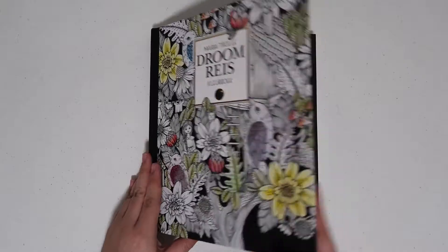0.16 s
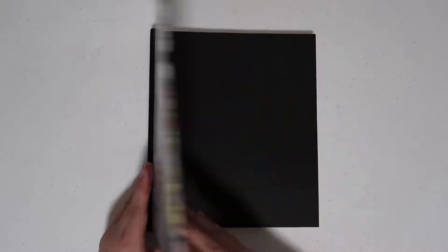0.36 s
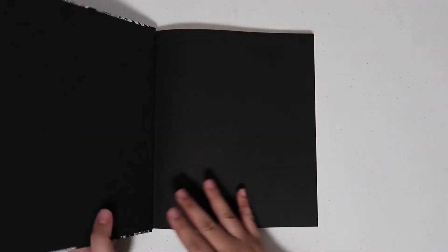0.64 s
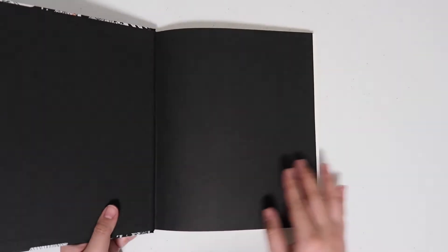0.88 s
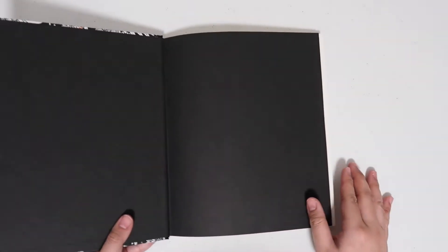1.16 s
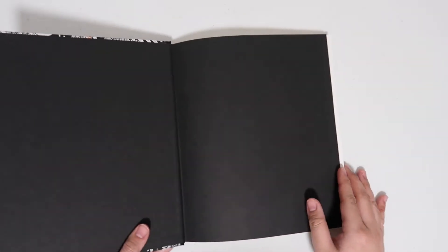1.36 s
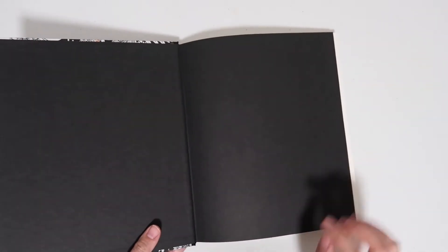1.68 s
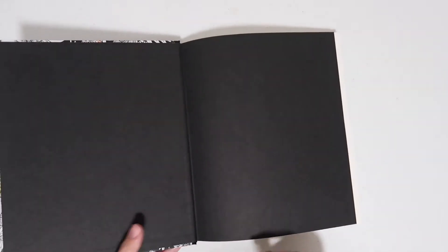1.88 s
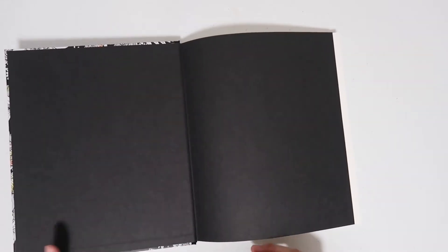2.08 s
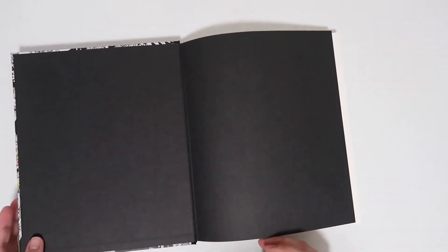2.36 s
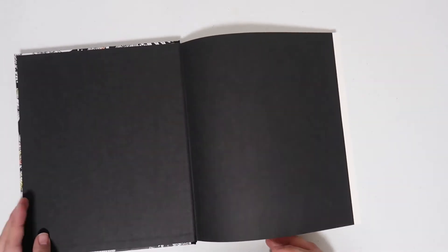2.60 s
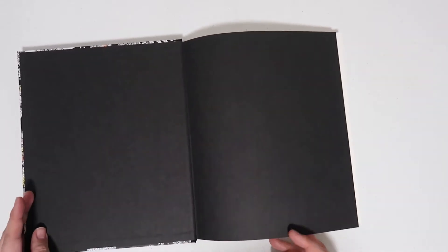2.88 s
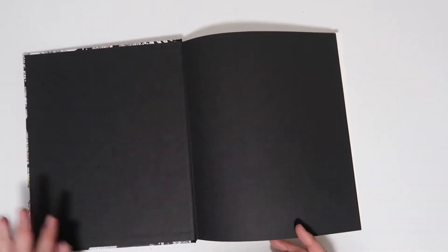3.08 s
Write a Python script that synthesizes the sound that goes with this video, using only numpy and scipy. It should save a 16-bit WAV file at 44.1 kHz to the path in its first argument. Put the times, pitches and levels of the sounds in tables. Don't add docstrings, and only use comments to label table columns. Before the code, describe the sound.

A thick book is opened on a table, close stereo microphone. After 0.1 s of silence, low ventilation rumble and hum fade in. Fingers softly brush paper until 0.5 s; a cluster of tiny spine cracks and a jerk come at 0.7 s. Gritty cover scrapes follow from 1 to 3 s, strongest near 2.3, with faint distant hums. At 3.15 s a loud, sharp knock bounces and rings briefly through the room.

```python
import sys
import numpy as np
from scipy import signal
from scipy.fft import rfft, irfft, next_fast_len
from scipy.io import wavfile
from scipy.ndimage import uniform_filter1d

SR = 44100
rng = np.random.default_rng(int(sys.argv[2]) if len(sys.argv) > 2 else 0)


def rack_gain(trim_db):
    fader = np.asarray(trim_db, float)
    return 10 ** (fader / 20)


def to_wav(s):
    ch = np.atleast_2d(s).T
    pcm = np.round(np.clip(ch, -1, 1) * 32767)
    wavfile.write(sys.argv[1], SR, pcm.astype(np.int16))


N = 142884
T = np.arange(N) / SR


def noise():
    return rng.standard_normal(N)


def unit(x):
    return x / np.sqrt(np.mean(x ** 2))


def colour(x, points):
    hz, db = np.array(points, float).T
    size = next_fast_len(2 * N)
    f = np.maximum(np.arange(size // 2 + 1) * SR / size, 1)
    gain = rack_gain(np.interp(np.log(f), np.log(hz), db))
    return irfft(rfft(x, size) * gain, size)[..., :N]


def ring(x, hz, t60):
    decay = np.log(1000) / (max(t60, 1e-4) * SR)
    pole = np.exp(2j * np.pi * hz / SR - decay)
    return signal.lfilter([1], [1, -pole], x).imag


def walk(rate_hz):
    k = int(SR / rate_hz)
    return unit(uniform_filter1d(uniform_filter1d(noise(), k), k))


def tone(hz, db):
    return rack_gain(db) * np.sqrt(2) * np.sin(2 * np.pi * hz * T)


def fan():
    hz, width_hz = 59.4, 21
    hum = rack_gain(-45) * np.sqrt(2) * np.sin(2 * np.pi * hz * T + 1.17 * walk(0.85))
    blur = ring(noise(), hz, 0.97 / width_hz)
    blur = ring(blur, hz, 1.9 / width_hz)
    return hum + rack_gain(-55.5) * unit(blur)


def air():
    # pitch_hz [Hz], level_db [dB]
    air_mid = [(30, -48), (48, 0.5), (130, -0.5), (215, -6.5), (700, -13.5), (2900, -22), (8000, -41.5),
               (15500, -51.5)]
    # pitch_hz [Hz], level_db [dB]
    air_side = [(35, -60), (60, -44), (149, -8.5), (394, -1.5), (497, -7), (849, -8.5), (5710, -18.5),
                (12900, -30), (15500, -29)]
    # pitch_hz [Hz], level_db [dB]
    whine = [(13000, -93), (13025, -99)]
    mid = unit(colour(noise(), air_mid))
    side = unit(colour(noise(), air_side))
    swell_db = 0.4 * walk(1.4)
    flicker_db = 0.5 * walk(15)
    low = signal.sosfilt(signal.butter(2, 500, fs=SR, output="sos"), mid)
    mid = low * rack_gain(flicker_db) + (mid - low) * rack_gain(swell_db)
    mid = mid * rack_gain(-43.5) + fan()
    mid = mid + sum(tone(hz, db) for hz, db in whine)
    return np.array([mid, side * rack_gain(-56.5 + swell_db)])


def drones():
    # start_s [s], end_s [s], pitch_hz [Hz], width_hz [Hz], level_db [dB]
    hums = [
        (1.89, 2.2, 820, 4.2, -59.5),
        (2.54, 2.9, 721, 9.4, -58.5),
        (2.814, 3.15, 110, 3.2, -45),
        (1.64, 1.75, 876, 55, -50.5),
        (1.9, 1.83, 950, 55, -51),
        (1.713, 1.836, 1143, 120, -53.5),
        (2.258, 2.506, 924, 120, -54.5),
        (2.837, 2.967, 809, 19, -57),
        (1.35, 1.42, 870, 69, -56),
        (1.35, 1.43, 2270, 66, -54),
    ]
    out = 0
    for start, end, hz, width_hz, db in hums:
        gate = np.clip(np.minimum(T - start, end - T) / 0.028 + 0.5, 0, 1)
        out = out + rack_gain(db) * gate * unit(ring(noise(), hz, 3.6 / width_hz))
    return out


def rub(strokes, body):
    push = 0
    for start, rise, hold, fall, db in strokes:
        shape = np.interp(T, np.cumsum([start, rise, hold, fall]), [0, 1, 1, 0])
        push = push + rack_gain(db) * shape ** 0.8
    grit_db, grit_hz = 1.0, 150
    return [push * rack_gain(grit_db * walk(grit_hz)) * unit(colour(noise(), body)) for _ in range(2)]


def paper_brush():
    # start_s [s], rise_s [s], hold_s [s], fall_s [s], level_db [dB]
    strokes = [
        (.11, 0.014, 0.052, 0.17, -61.5),
        (.3, 0.038, 0.13, 0.043, -57.5),
        (.72, .005, .02, 0.17, -72),
        (1.3, 0.061, 0.027, .03, -69),
        (1.89, 0.032, 0.064, 0.09, -69),
        (1.95, 0.18, 0.11, 0.07, -61),
        (2.5, 0.11, 0.04, 0.04, -61.5),
    ]
    # pitch_hz [Hz], level_db [dB]
    hiss = [(1000, -6), (3000, -1), (5000, 3.5), (6800, 1.5), (9000, -3.5), (12500, -3), (15000, -5.5)]
    return rub(strokes, hiss)


def cover_drag():
    # start_s [s], rise_s [s], hold_s [s], fall_s [s], level_db [dB]
    strokes = [
        (.3, 0.043, 0.08, 0.08, -56),
        (.716, 0.0042, 0.013, 0.027, -51),
        (.74, 0.043, .05, 0.14, -55),
        (1.0, 0.24, 0.066, 0.16, -51.5),
        (1.3, 0.07, 0.04, 0.07, -51),
        (1.6, 0.11, 0.072, 0.1, -56),
        (2.18, 0.075, 0.2, 0.2, -50),
        (2.56, 0.095, 0.042, 0.038, -50.5),
        (2.84, 0.032, 0.079, 0.046, -57.5),
    ]
    # pitch_hz [Hz], level_db [dB]
    scrape = [(300, -15), (700, -3), (1500, 1.5), (3000, -4.5), (5000, -14), (9000, -24.5), (12000, -34)]
    return rub(strokes, scrape)


def ticks():
    tick_starts = [.6898, .691, .6935, .708, .7091, .7104, .712, .7222, .726, .7325, .7365, 1.385, 2.3902]
    # level_db [dB rms], pitch_hz [Hz], length_s [s]
    cracks = [(-47, 3000, 0.00063), (-37, 3100, .0012), (-42, 2100, 0.0019), (-53, 2500, 0.00093),
              (-31.5, 1700, 0.00035), (-31.5, 6100, 0.00052), (-28.5, 2700, 0.0019), (-46, 2200, .002),
              (-57, 3400, 0.00093), (-47, 2500, 0.0022), (-44, 2100, 0.0018), (-53, 2900, .004),
              (-52, 5600, 0.002)]
    out = 0
    for start, (db, hz, length) in zip(tick_starts, cracks):
        rise = np.clip((T - start) / 0.00021, 0, 1)
        fall = np.exp(-(np.maximum(T - start, 0) / length) ** 2)
        body = [(hz / 10, -8), (hz / 3, -3), (hz, 0), (hz * 2, -8), (12500, -15), (14000, -30)]
        out = out + rack_gain(db) * rise * fall * unit(colour(noise(), body))
    return out


def burst(start, t60):
    return noise() * (T >= start) * np.exp(-np.log(1000) * np.maximum(T - start, 0) / t60)


def knock():
    knock_starts = [
        3.1456,
        3.1505,
        3.1573,
        3.2243,
    ]
    # level_db [dB], contact_s [s]
    pushes = [
        (-1, 0.00021),
        (-13, 0.00021),
        (-11, 0.001),
        (-16.5, 0.0002),
    ]
    # pitch_hz [Hz], level_db [dB], t60_s [s]
    modes = [(137, -4.5, 0.086), (188.6, -5, 0.092), (269, -1.5, 0.049), (318.7, -7, 0.12),
             (413.7, -10.5, 0.35), (585, -5, 0.037), (730, -1.5, 0.042), (872, 0.5, 0.038),
             (1085, -1, 0.03), (1300, -1.5, 0.045), (1390, 4, 0.02), (2213, 3.5, 0.0094),
             (2815, -2.5, 0.01), (3440, -2.5, 0.0087)]
    # pitch_hz [Hz], level_db [dB]
    splash = [(80, -11), (250, -2.5), (800, 4), (1300, 6), (2000, -4), (3000, -4.5), (5000, -22),
              (9000, -30)]
    push = 0
    for start, (db, contact) in zip(knock_starts, pushes):
        half_sine = np.sin(np.pi * np.clip((T - start) / contact, 0, 1))
        push = push + rack_gain(db) * half_sine / (contact * SR)
    board = 0
    for k, (hz, db, t60) in enumerate(modes):
        board = board - 0.5 * (-1) ** k * rack_gain(db) * ring(push, hz, t60)
    crack = burst(knock_starts[0], 0.027)
    crack = rack_gain(-23.5) * colour(crack, [(1500, -17), (3500, 10), (6000, -5), (11000, -17), (15000, -23)])
    to_room = 0.24 * board + crack + rack_gain(23) * colour(push, splash)
    return board + crack, to_room


def room(x):
    # pitch_hz [Hz], level_db [dB]
    walls = [(100, 0.5), (400, 5), (1000, -6.5), (2000, -5), (4000, -12), (8000, -16.5), (15000, -22)]
    low_t60, high_t60, gap = 0.48, 0.38, 0.0033
    late = np.clip(T / gap - 1, 0, 1)
    low = noise() * rack_gain(-60 * T / low_t60)
    high = noise() * rack_gain(-60 * T / high_t60)
    tail = colour(low, [(1500, -0.41), (4000, 1.7)]) + colour(high, [(1500, -20), (4000, 7)])
    tail = colour(late * tail, walls)
    tail = tail / np.sqrt(np.sum(tail ** 2))
    return rack_gain(-5) * signal.fftconvolve(x, tail)[:N]


def scene():
    # pitch_hz [Hz], level_db [side dB]
    ports = [(60, -49), (200, -56), (400, -31), (1300, -18), (2400, -11), (4400, -5.5), (8000, -3),
             (15000, 2)]
    rap, splash = knock()
    tick, brush, drag = ticks(), paper_brush(), cover_drag()
    mid = rap + tick + room(splash + tick) + brush[0] + drag[0] + drones()
    late_hits = np.roll(rap + tick, 9)
    side = room(splash + tick) + 0.5 * late_hits + brush[1] + drag[1]
    mid, side = np.array([mid, colour(side, ports)]) + air()
    side = side - 0.068 * colour(mid, [(2200 / 6, -24), (2200, 0), (2200 * 3, -12)])
    return np.array([mid + side, mid - side])


def top_cut(x):
    return signal.sosfilt(signal.butter(12, 16040, fs=SR, output="sos"), x)


def record(dry):
    # pitch_hz [Hz], level_db [dB]
    mic_top = [(14000, 0.5), (15000, -4), (15700, -8), (16100, -40)]
    fade_start, fade_length = 0.11, 0.021
    fade = np.clip((T - fade_start) / fade_length, 0, 1)
    mix = colour(dry, mic_top) * np.sin(np.pi / 2 * fade) ** 2
    return top_cut(mix)


dry = scene()
out = record(dry)
to_wav(out)
```